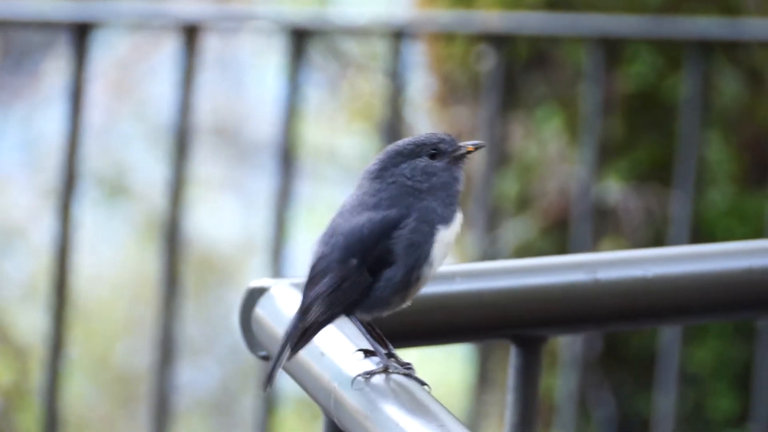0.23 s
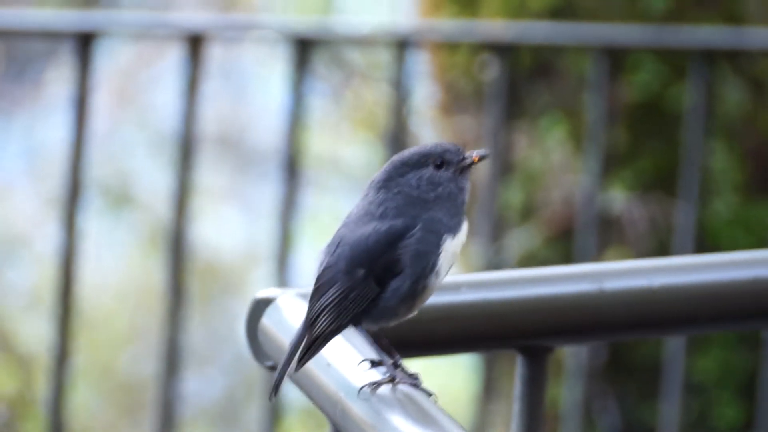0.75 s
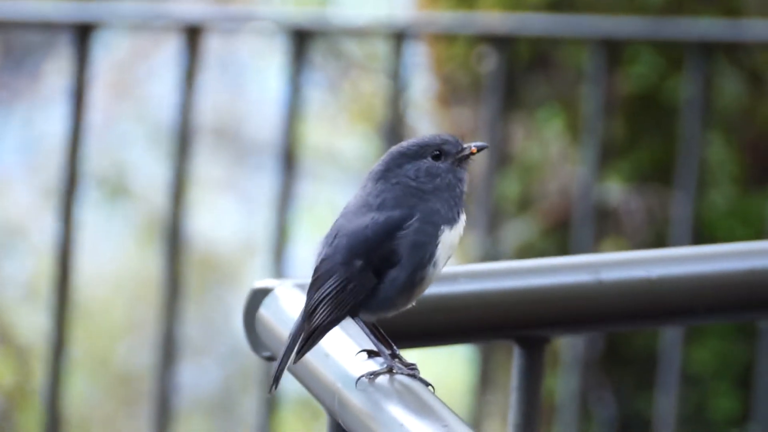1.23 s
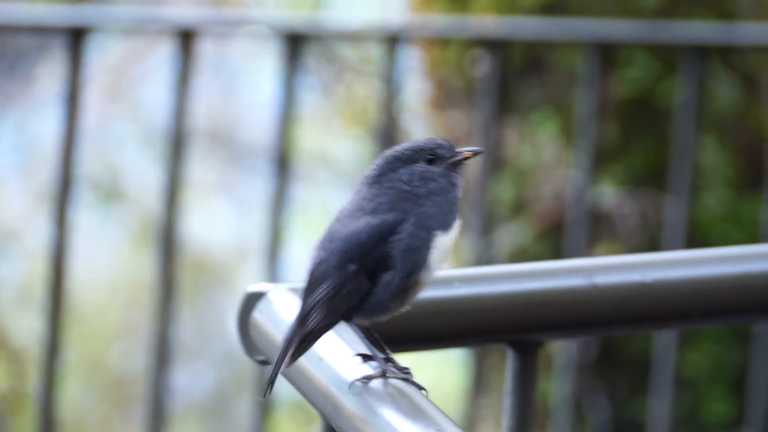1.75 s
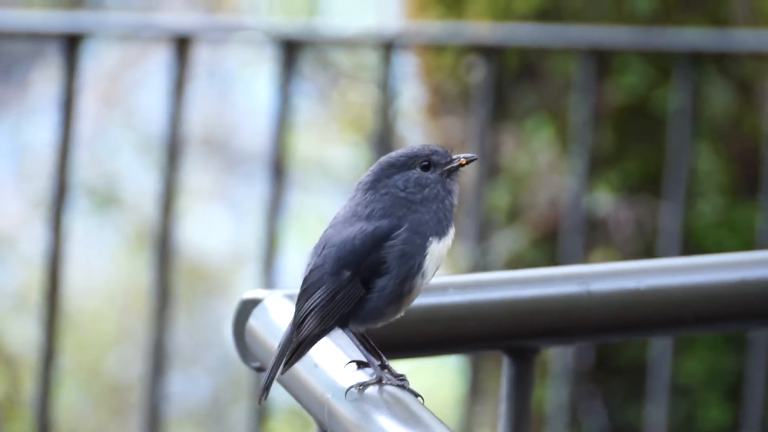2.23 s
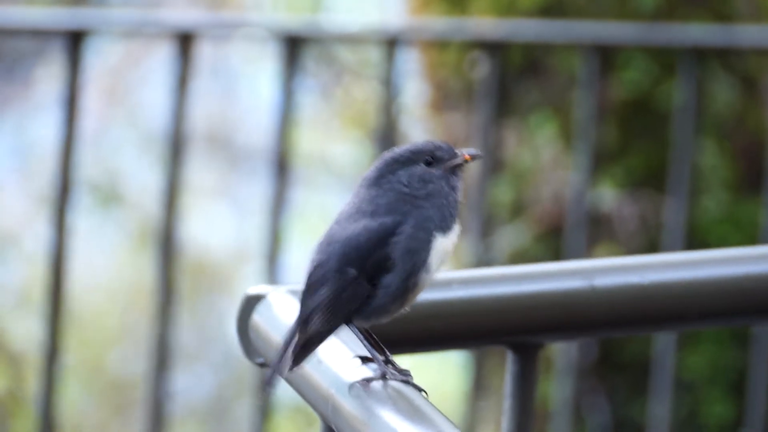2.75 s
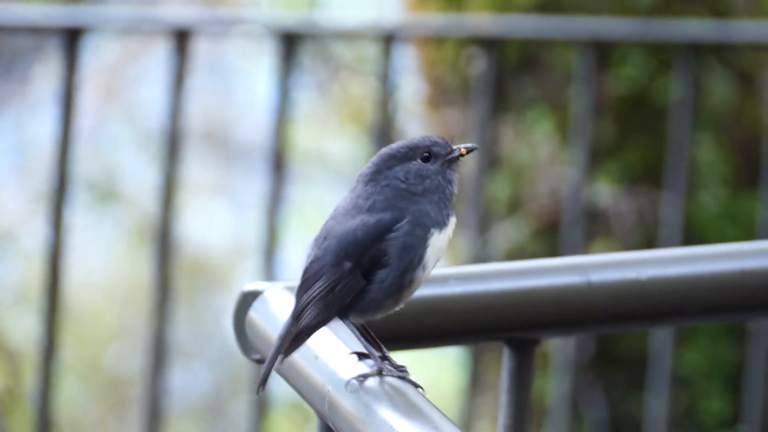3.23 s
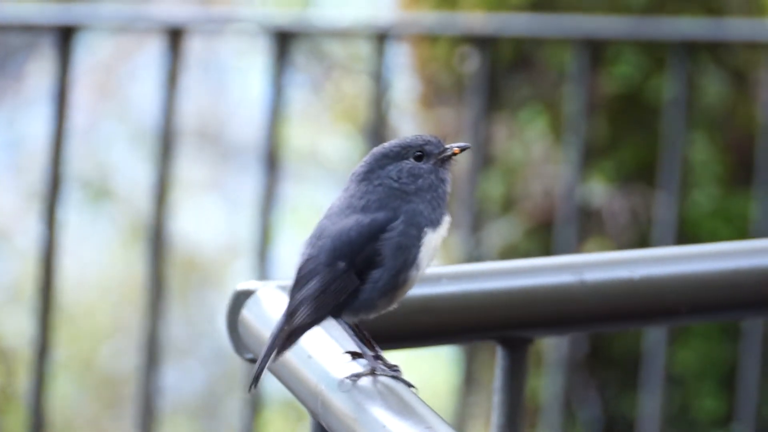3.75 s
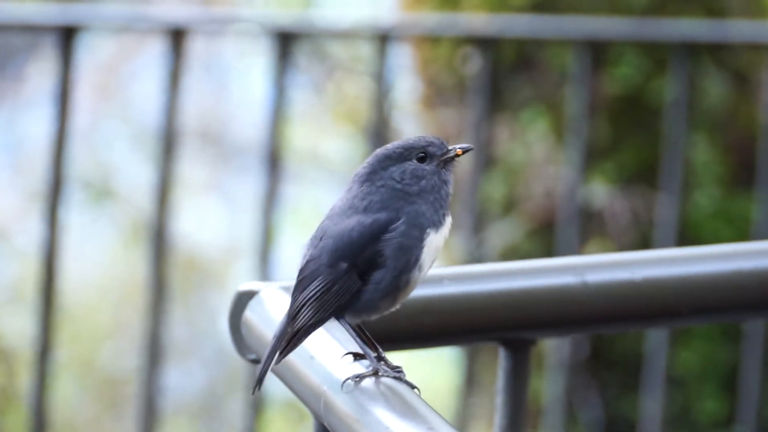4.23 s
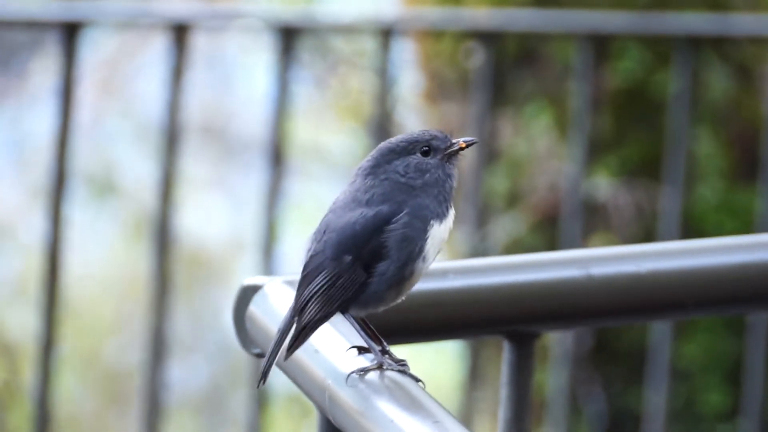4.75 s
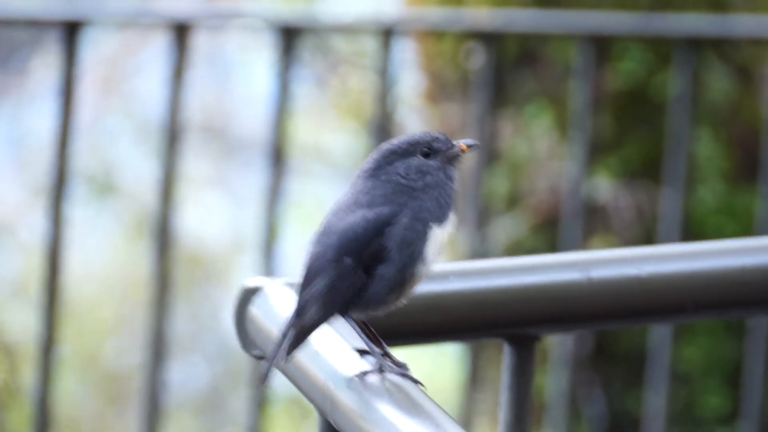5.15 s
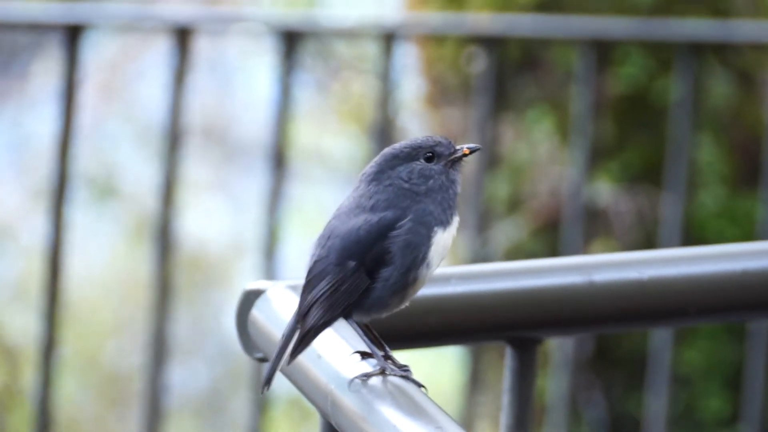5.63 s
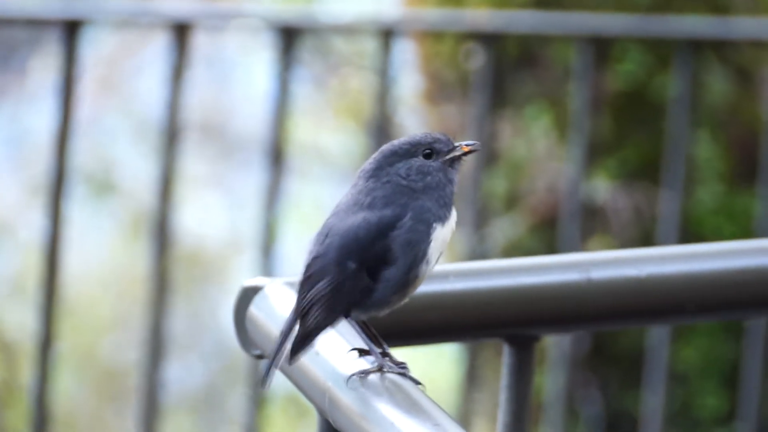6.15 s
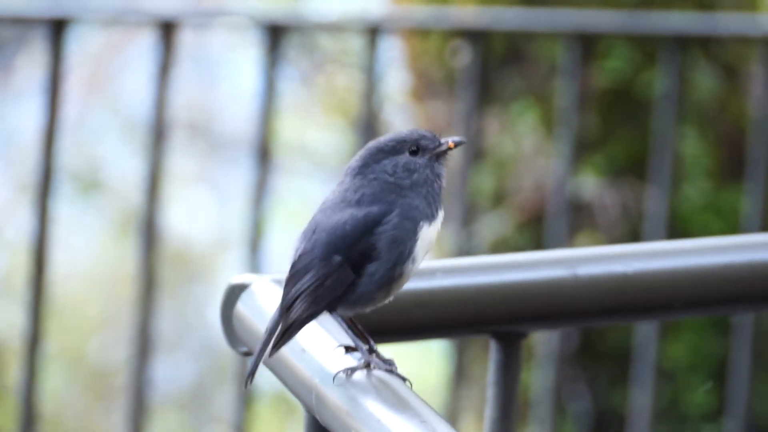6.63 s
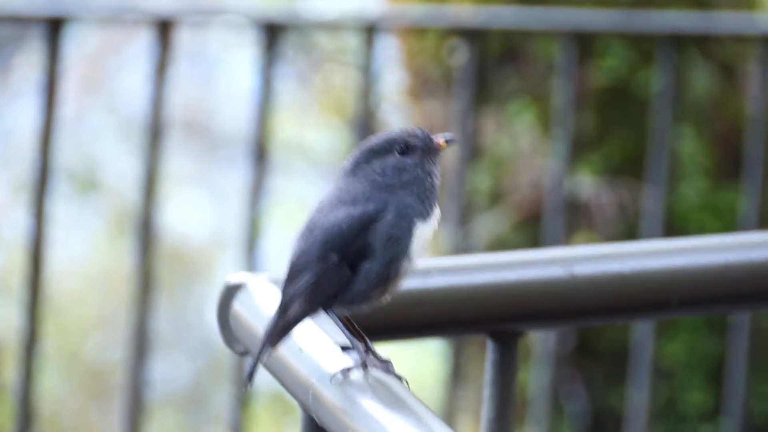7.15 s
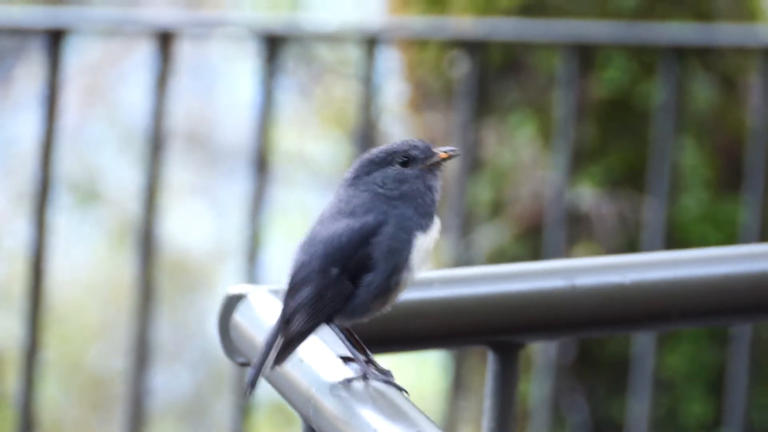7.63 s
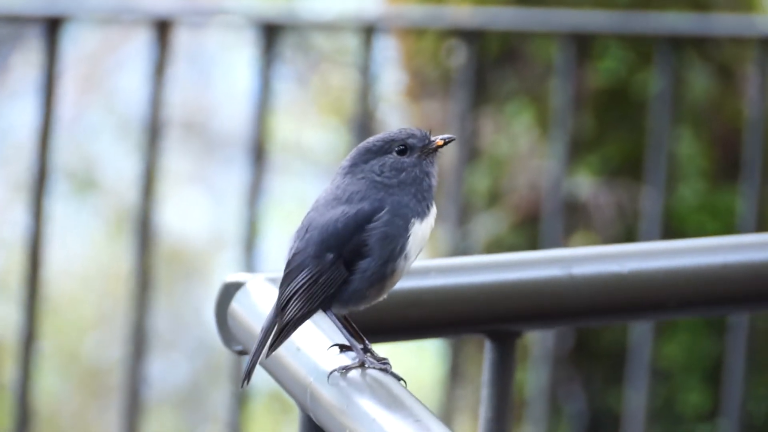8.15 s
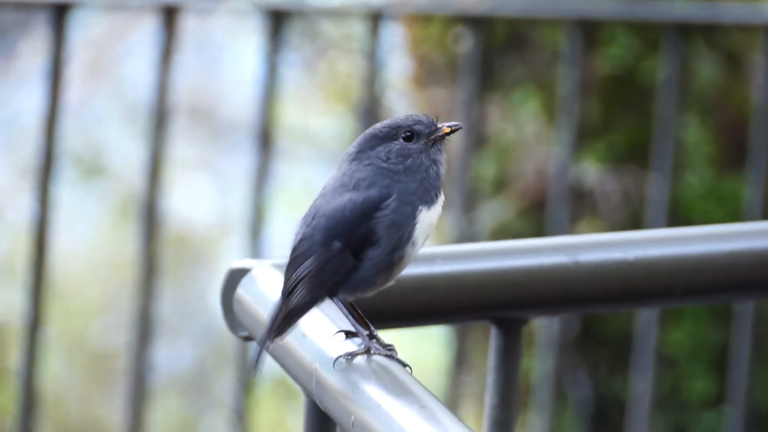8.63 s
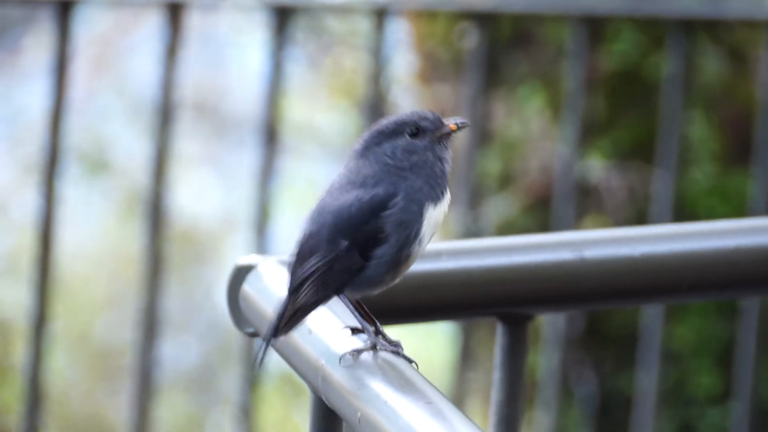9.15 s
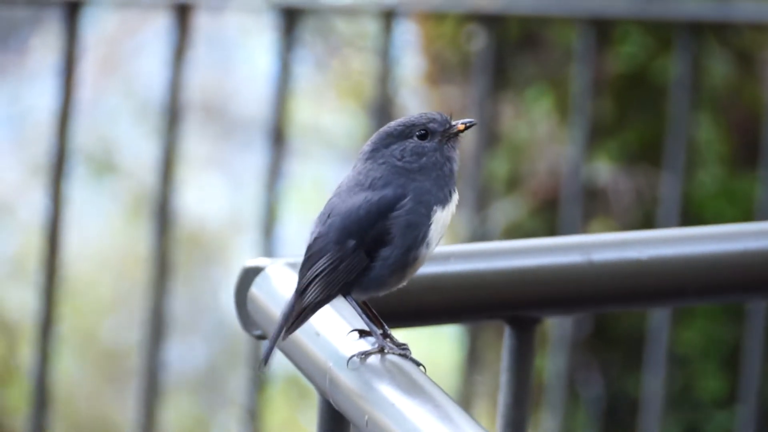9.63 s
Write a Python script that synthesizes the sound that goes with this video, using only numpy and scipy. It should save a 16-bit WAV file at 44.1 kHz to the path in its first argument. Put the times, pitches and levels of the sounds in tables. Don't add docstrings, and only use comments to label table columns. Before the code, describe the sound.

Bright, piercing birdsong switches between repeated high cheeps, buzzy trills and quick pips, with short woodland echoes and faint steady wind and water behind.

```python
import sys
import numpy as np
from scipy import signal
from scipy.fft import rfft, irfft
from scipy.io import wavfile
from scipy.ndimage import uniform_filter1d

SR = 44100
rng = np.random.default_rng(int(sys.argv[2]) if len(sys.argv) > 2 else 0)


def makeup_ratio(level_db):
    decades = np.asarray(level_db, float) / 20
    return 10 ** decades


def int16_out(signal):
    q = np.round(np.clip(np.atleast_2d(signal).T, -1, 1) * 32767)
    wavfile.write(sys.argv[1], SR, q.astype(np.int16))


N = 436568


def bird():
    phrases = opening() + chips() + rises() + trills() + duos() + small_calls() + falls() + closing()
    out = np.zeros(N + SR)
    for shape, notes, ratio, tones, *voice in phrases:
        for start_s, stretch, factor, db, *gap_hz in notes:
            note = makeup_ratio(db) * syllable(shape, stretch, factor, sum(gap_hz), ratio, tones, *voice)
            at = int((start_s + 0.09947) * SR)
            out[at:at + len(note)] += note
    return out[SR // 10:][:N]


# (time [s], level [dB])
LONE = [
    (2.981, -27),
    (4.3408, -26.5),
    (4.64, -30),
    (4.943, -20),
    (5.213, -20.5),
    (6.378, -26),
    (7.031, -24.5),
    (7.597, -24.5),
    (7.95, -28),
    (8.322, -26.5),
]


def lone(name):
    names = "low wide narrow first quick scoop cracked deep even held".split()
    start_s, db = LONE[names.index(name)]
    return [(start_s, 1, 1, db)]


# (time [ms], lower voice [Hz], level [dB])
CHEEP = [(0, 4760, -12), (3.02, 4750, -3.5), (5, 4840, 0.5), (6.94, 4785, -1.5), (9.24, 4950, 1.5),
         (13.1, 5340, -2), (16.8, 5680, -3), (20.6, 5900, -8.5)]
UPSLUR = [(0.0, 3520.0, -13.5), (4.87, 3492, 1), (21.3, 3533.3, 2), (30, 3670.0, -1.5), (41.4, 3780.0, 3),
          (54.8, 3930.0, -2.5), (65, 4020, -10.5)]
LOWRISE = [(0.0, 1490, -26), (5.932, 1900.0, -11), (11.96, 2170.0, -8.5), (20.019, 2330.0, -0.5),
           (32.393, 2470.0, -4.5), (43.62, 2520.0, -5.5)]
# (time [s], stretch [x], pitch [x], level [dB])
CHEEPS = [(-0.003, 1.0, 0.99, -32.5), (0.1785, 1.1, 0.98, -29.5), (0.357, 1.16, 0.99, -30.5),
          (0.537, 1.04, 1.0, -29.5), (0.727, 1.03, 0.983, -31.5), (0.924, 0.99, 0.98, -30.5)]
UPSLURS = [(1.136, 1.01, 1.02, -21.5), (1.3658, 0.99, 1.007, -20.5), (1.5877, 0.99, 1.01, -19.5),
           (1.8118, 1.02, 1.003, -19.5), (2.0562, 1.05, 1.003, -21.5), (2.286, 1.02, 1.0037, -20.5),
           (2.514, 1.06, 0.99798, -20.5), (2.757, 1.04, 0.99237, -20.5)]
# (tone, levels evenly from start to end [dB])
CHEEP_TONES = [("upper", -31, 0, 3.5, 4.9, 2, 2.4, 0), ("under", -46, -21, -17, -41),
               ("beyond", -33, -18, -17, -41), ("octave", -31.5, -14.5, -15.5, -16.5),
               ("both", -39.5, -13, -19, -22.5), ("third", -24, -9.5, -15)]
UPSLUR_TONES = [("octave", -35, -26), ("third", -33, -33.5)]
LOWRISE_TONES = [("octave", 13, -3.3, -22.5, -17), ("third", -29, -32.5), ("fourth", -11, -46)]


def opening():
    cheep_ratio = (1.35, 1.35, 1.335, 1.335, 1.31, 1.26, 1.3)
    return [(CHEEP, CHEEPS, cheep_ratio, CHEEP_TONES, False, 2.0),
            (UPSLUR, UPSLURS, 1, UPSLUR_TONES),
            (LOWRISE, lone("low"), 1, LOWRISE_TONES)]


# (time [ms], share of the way from end to top pitch [0-1], level [dB])
CHIP_LOW = [(0, 0.905, -7), (2, 0.99, -8), (4, 1, 0.5), (6, 0.865, 0), (8, 0.624, 0.5), (10, .38, -1.5),
            (12, 0.24, -6), (15, 0.055, -11.5), (18, 0.14, -16)]
CHIP_HIGH = [(0, 0.93, -14), (2, 1, -9.5), (4, 0.885, -8.5), (6, 0.715, -2), (8, .48, 3.5), (11, .27, 0),
             (14, .09, 2), (17, 0, -1.5), (20, 0, -7)]
# (time [s], stretch [x], top pitch [Hz], end pitch [Hz], level [dB])
CHIP_LOWS = [(3.153, 1.0, 3750, 1700, -25.5), (3.351, 1.0, 4170, 1740, -26),
             (3.546, 1.0, 4730, 1900, -23.5), (3.728, 0.9, 3970, 1710, -26.5),
             (3.907, .9, 3780, 1850, -29.5), (4.098, 1.0, 4840, 2020, -25.5)]
CHIP_HIGHS = [(3.152, 1.16, 5950, 3400, -30), (3.351, 1.12, 5900, 3370, -30),
              (3.546, 1.0, 5830, 3380, -29.5), (3.727, 1.0, 5400, 3315, -28.5),
              (3.906, 1.16, 5160, 3320, -26.5), (4.098, 0.83, 6870, 4600, -29.5)]
# (tone, levels from start to end [dB])
CHIP_TONES = [("both", -50, -17, -7, -30), ("octave", -37, -32)]
PURE = [("octave", -18, -23), ("third", -27, -33), ("fourth", -56, -62)]


def chips():
    gap_hz = 1153
    phrases = []
    for shape, notes, tones in (CHIP_LOW, CHIP_LOWS, CHIP_TONES), (CHIP_HIGH, CHIP_HIGHS, PURE):
        for start_s, stretch, top, end, db in notes:
            fall = [(ms, end + share * (top - end), level) for ms, share, level in shape]
            phrases.append((fall, [(start_s, stretch, 1, db, gap_hz)], 1, tones, True, 2.5))
    return phrases


# (first pitch peak [ms], peaks over troughs [dB], rows of
# (time [ms], centre [Hz], swing [Hz], period [ms], level [dB]))
RISE_WIDE = (13.0, -4, [(0, 3500, 300, 17.5, -20), (5, 3800, 550, 17.5, -4), (12, 4250, 450, 17, -1),
             (40, 4500, 300, 16.5, -3), (70, 4800, 120, 16.5, -6), (96, 5050, 5, 16.5, -9)])
RISE_NARROW = (12.5, -2, [(0, 3850, 50, 15, -5), (12, 4650, 320, 15, -3), (28, 4620, 170, 14, -5),
               (60, 4700, 150, 14, -5), (89, 5050, 5, 14, -4)])
# (tone, levels from start to end [dB])
WIDE_TONES = [("upper", -4, -8.5, -22), ("octave", -11, -33), ("both", -22, -29.5),
              ("upper_octave", -29, -33), ("third", -19, -25.5)]
NARROW_TONES = [("upper", -1.036, 7.2, -7, -15, -25), ("octave", -7, -26), ("both", -13, -33),
                ("upper_octave", -22.5, -29.5), ("third", -13.5, -29)]


def rises():
    return [(warble(*RISE_WIDE), lone("wide"), 1.49, WIDE_TONES, False, 2.2),
            (warble(*RISE_NARROW), lone("narrow"), 1.47, NARROW_TONES, False, 2.2)]


# (first pitch peak [ms], peaks over troughs [dB], rows of
# (time [ms], centre [Hz], swing [Hz], period [ms], level [dB]))
TRILL = (0.3, 0, [(0, 3500, 650, 19, -16), (3, 3500, 650, 19, -6.5), (10, 3650, 740, 18, -1),
         (18.1, 3850, 640, 16.5, 0.5), (35.2, 4030, 690, 19, -0.5), (51, 3950, 690, 16.5, -3),
         (68.2, 3950, 810, 17.5, -6), (85, 3820, 500, 16.5, -8.5), (94, 3750, 450, 17, -14)])
TRILL_QUICK = (0.1, 0, [(0, 3400, 600, 18, -12), (3, 3400, 570, 18, -4), (9, 3550, 765, 17.5, -2.5),
               (17.5, 3800, 700, 18, 1.5), (34, 3760, 630, 14, -3), (49.5, 3870, 720, 16.5, -2.5),
               (67.2, 3810, 610, 9.7, -4), (81.7, 3600, 500, 14.9, -6), (89.8, 3500, 500, 15, -7.5)])
TRILL_DEEP = (0.1, 0, [(0, 3300, 580, 18, -12), (3, 3300, 620, 18, -5), (9.05, 3420, 786, 18, -1.5),
              (17.9, 3780, 670, 16.8, 0), (35, 3830, 630, 16.3, -1), (51.3, 3880, 820, 17, -4),
              (69, 3850, 780, 19, -4), (85.6, 3780, 664, 17.5, -5.5), (96, 3650, 670, 18.6, -9)])
# (time [s], stretch [x], pitch [x], level [dB])
DEEP_TRILLS = [(5.488, 0.99, 0.98, -20.5), (5.770, 0.98, 1.0, -20)]
# (tone, levels from start to end [dB])
TRILL_TONES = [("octave", -20.5, -25.5, -23.5), ("third", -31, -34)]


def trills():
    kinds = (TRILL, lone("first")), (TRILL_QUICK, lone("quick")), (TRILL_DEEP, DEEP_TRILLS)
    return [(warble(*shape), notes, 1, TRILL_TONES, True, 1.8) for shape, notes in kinds]


# (time [ms], lower voice [Hz], level [dB])
DUO = [(0.0, 4800.0, -11), (5.0824, 5420, 0.5), (14.4, 4960, -1), (23, 4400, -10)]
SINK = [(0, 5300, -14), (2.996, 5550, -3.5), (11.805, 5190, -1.5), (21.84, 4950, -7.5)]
# (time [s], stretch [x], pitch [x], level [dB], optional voice gap [Hz])
DUOS = [(6.044, 1.0, 0.98, -29, 15)]
SINKS = [(6.192, 0.97, 0.97, -29.5)]
# (tone, levels from start to end [dB])
DUO_TONES = [("upper", -2, 0.86, 0, -4, -30), ("under", -33, -31, -16, -24, -40), ("octave", -16.5, -17),
             ("both", -23, -16, -30), ("upper_octave", -16, -22.5, -40), ("third", -9, -20)]


def duos():
    sink_tones = DUO_TONES[:1] + DUO_TONES[2:]
    return [(DUO, DUOS, (1.56, 1.418, 1.26, 1.26, 1.25), DUO_TONES, False, 2.0),
            (SINK, SINKS, (1.31, 1.29, 1.24, 1.13, 1.1), sink_tones, False, 2.0)]


# (time [ms], lower voice [Hz], level [dB])
HIGHPIP = [(0, 4000, -11), (1.5, 4450, -1), (4, 4640, 2), (10, 4780, 2.5), (12.5, 4930, -1), (15, 4950, -8)]
CRACKED = [(0, 4440, -10), (2.5, 4630, 1), (6, 5050, 1), (9, 5100, -1), (12, 5270, -2), (16.9, 5300, -7),
           (24, 5200, -10), (32.2, 5500, -18)]
SCOOP = [(0, 3430, -3), (2, 3330, -1), (5, 3170, 3), (8, 3120, 1.5), (12, 3270, 2), (16, 3330, 4.5),
         (20, 3500, 2.5), (22, 3400, -13)]
DROP = [(0, 5700, -22), (2, 4600, -8), (4.03, 4040, -1.5), (7, 3730, 1.5), (10, 3590, 2), (13, 3560, 1.5),
        (19, 3620, -1), (23, 3665, -3.5), (26, 3630, -12)]
BLIP = [(0, 2509, -19), (4, 2486, -2), (9, 2632, -3)]
HOOK = [(0, 3950, -10), (3, 4080, 1), (6, 4430, -1), (9, 4600, -12)]
CHUCK = [(0.0, 2980, 1), (2.9899, 2900.0, 0), (8.185, 2450.0, 3.5), (14.7, 2050, -1.5), (22.1, 1740, -5)]
# (time [s], stretch [x], pitch [x], level [dB])
HIGHPIPS = [(6.3399, 1.0, 1.005, -23.5), (6.564, 0.98, 0.995, -23), (6.8037, 1.0, 1, -22.5)]
DROPS = [(6.599, 0.98, 1, -19.5), (6.840, 1.0, 1.002, -18.5), (7.066, 1.03, 1.01, -18)]
BLIPS = [(6.816, 0.869, 0.9636, -45.5)]
HOOKS = [(4.112, 1.0, 0.96, -25.5)]
CHUCKS = [(7.244, 1.1, 1.0237, -30.5), (7.402, 1.06, 0.96, -31)]
# (tone, levels from start to end [dB])
HIGHPIP_TONES = [("octave", -21.5, -29), ("third", -38, -42)]
CRACKED_TONES = [("octave", -24, -24, -30), ("upper", -60, -31, -13, -40, -60, -60),
                 ("both", -60, -32, -22, -45, -60, -60), ("over", -60, -30, -22, -45, -60, -60)]
DROP_TONES = [("octave", -22.5, -32.5, -36), ("third", -26, -33.5, -38)]
CHUCK_TONES = [("octave", -52, -18, -7, -9), ("third", -25, -44), ("fourth", -37.5, -39.5)]


def small_calls():
    return [(HIGHPIP, HIGHPIPS, 1, HIGHPIP_TONES),
            (CRACKED, lone("cracked"), 0.5, CRACKED_TONES, False, 1.5),
            (SCOOP, lone("scoop"), 1, DROP_TONES),
            (DROP, DROPS, 1, DROP_TONES),
            (BLIP, BLIPS, 1, PURE),
            (HOOK, HOOKS, 1, PURE, False, 2.0),
            (CHUCK, CHUCKS, 1, CHUCK_TONES, False, 2.5)]


# (first pitch peak [ms], peaks over troughs [dB], rows of
# (time [ms], centre [Hz], swing [Hz], period [ms], level [dB]))
FALL_DEEP = (9.8, -15, [(0, 7600, 300, 19.2, -17), (10, 7700, 300, 19.2, -6), (24, 7500, 250, 19.2, -8),
             (38, 6450, 1100, 19.5, -14), (76, 5850, 950, 18.3, -11), (110, 5330, 950, 17.2, -7),
             (152, 5200, 800, 17.4, -10)])
FALL_EVEN = (5.2, -3, [(0, 7400, 500, 18.6, -1), (20, 7000, 650, 18.4, 0), (50, 6480, 720, 16.4, -5),
             (100, 6000, 720, 15.5, -4), (150, 5500, 550, 15.5, -4)])
FALL_HELD = (18.5, -4, [(0, 7500, 5, 19, -4), (5, 7850, 5, 19, 2), (21, 7700, 50, 19, 3),
             (28, 7100, 500, 19, 0), (56, 6550, 650, 18.5, -6), (72, 6250, 600, 15, -6),
             (130, 5750, 500, 14.6, -8)])
# (tone, levels from start to end [dB])
FALL_TONES = [("octave", -15, -21.5, -23)]


def falls():
    return [(warble(*FALL_DEEP), lone("deep"), 1, FALL_TONES, False, 1.5),
            (warble(*FALL_EVEN), lone("even"), 1, FALL_TONES, False, 1.6),
            (warble(*FALL_HELD), lone("held"), 1, FALL_TONES, False, 1.4)]


# (time [ms], lower voice [Hz], level [dB])
LOWPIP = [(0.0, 3300, -8.5), (3.0, 3441.8, 2), (8.0, 3590.0, 3.5), (14.0, 3560.0, 0.5), (18.0, 3350, -7.5)]
MIDPIP = [(0.0, 4160, -1.5), (3.887, 4393, 2), (10.141, 4430.0, 3.5), (16.5, 4520.0, 2), (24.7, 4560, -24)]
ARCH = [(0, 3230, -9), (3.02, 4330, 1.5), (6, 5250, 0.5), (9.07, 5620, -1), (12.03, 5300, 1.5),
        (16.2, 4600, 0), (20, 4000, -4), (23.8, 3320, -18.5)]
# (time [s], stretch [x], pitch [x], level [dB])
LOWPIPS = [(8.6457, 1, 0.99763, -21.5), (8.8742, 1, 1.0075, -20), (9.1419, 0.96, 0.983, -22),
           (9.3871, 0.97, 1.027, -20.5)]
MIDPIPS = [(8.6943, 0.89, 1.0098, -21), (8.926, 1, 0.99114, -19.5), (9.192, 1, 0.976, -20),
           (9.437, 1, 1.016, -20)]
ARCHES = [(9.613, .98, 0.991, -22.5), (9.799, 1.01, 0.996, -24)]
# (tone, levels from start to end [dB])
LOWPIP_TONES = [("octave", -28, -39), ("third", -37.5, -31)]
MIDPIP_TONES = [("octave", -22.5, -26), ("third", -33, -45)]
ARCH_TONES = [("octave", -18, -27.5, -35), ("third", -27, -35)]


def closing():
    return [(LOWPIP, LOWPIPS, 1, LOWPIP_TONES),
            (MIDPIP, MIDPIPS, 1, MIDPIP_TONES),
            (ARCH, ARCHES, 1, ARCH_TONES, False, 1.8)]


def warble(peak_ms, peak_db, rows):
    ms, centre, swing, period, db = np.transpose(rows)
    step_ms = 0.5
    t = np.arange(0, ms[-1], step_ms)

    def along(values):
        return np.interp(t, np.maximum.accumulate(ms), values)

    turns = np.cumsum(step_ms / along(period))
    wave = np.cos(2 * np.pi * (turns - np.interp(peak_ms, t, turns)))
    hz = along(centre) + along(swing) * wave
    level_db = along(db) + peak_db / 2 * wave * along(swing) / max(swing)
    return np.transpose([t, hz, level_db])


MIX = dict(lower=(1, 0), upper=(0, 1), octave=(2, 0), third=(3, 0), fourth=(4, 0), both=(1, 1),
       under=(2, -1), over=(2, 1), beyond=(-1, 2), upper_octave=(0, 2))
# (frequency [Hz], level [dB])
THROAT = [(1800, -6.5), (2800, -4), (3300, -0.5), (3750, 3), (4500, -2), (5500, -2), (6600, -9), (7500, -4),
          (9000, 1.5), (16000, 3)]


def syllable(shape, stretch, factor, gap_hz, ratio, tones, throat=False, flutter_db=0.5):
    rise_ms, fall_ms, flutter_ms, wobble = 0.7, 2.66, 1.48, 0.0029
    ms, hz, db = np.transpose(shape)
    t = np.arange(int((ms[-1] * stretch + fall_ms) * SR / 1000)) * 1000 / SR
    place = np.interp(t / stretch, np.maximum.accumulate(ms), np.arange(len(ms)))

    def smooth(values):
        return uniform_filter1d(np.interp(place, np.arange(len(ms)), values), size=60, mode="nearest")

    def spread(values):
        return np.interp(t / t[-1], np.linspace(0, 1, np.size(values)), np.ravel(values))

    shake = uniform_filter1d(rng.standard_normal(len(t)), size=40) * 6
    lower = smooth(hz) * factor * (1 + wobble * shake)
    upper = lower * spread(ratio) + gap_hz
    out = 0
    for name, *tone_db in [("lower", 0)] + tones:
        lower_times, upper_times = MIX[name]
        f = lower_times * lower + upper_times * upper
        level_db = spread(tone_db) + throat * np.interp(f, *np.transpose(THROAT))
        out = out + makeup_ratio(level_db) * (f < 17000) * np.sin(2 * np.pi * np.cumsum(f) / SR)
    hold = max(int(flutter_ms * SR / 1000), 1)
    flutter = uniform_filter1d(uniform_filter1d(rng.standard_normal(len(t)), hold), hold)
    flutter = flutter * np.sqrt(1.5 * hold)
    edge = np.clip(t / rise_ms, 0, 1) * np.clip((t[-1] - t) / fall_ms, 0, 1)
    return out * makeup_ratio(smooth(db) + flutter_db * flutter) * np.sin(edge * np.pi / 2) ** 2


# (time [s], left minus right [dB])
HEAD = [
    (0, 0),
    (1, 0.5),
    (1.2, 1.5),
    (3, 1),
    (4, 1.5),
    (5.5, 1),
    (6.6, 2.5),
    (8, 1.5),
    (8.6, 2.5),
    (9.9, 2.5),
]


def direct_path(notes):
    lag_rad, lag_hz = 1.7, 5000
    pan_db = np.interp(np.arange(N) / SR, *np.transpose(HEAD))
    lag = np.exp(-1j * lag_rad * np.tanh(np.fft.rfftfreq(N, 1 / SR) / lag_hz))
    left = irfft(rfft(notes) * lag, N)
    return np.array([left, notes]) * makeup_ratio(np.array([pan_db, -pan_db]) / 2)


# (delay [ms], left [dB], right [dB])
NEAR = [(3.0, -24, -21), (6.6, -23, -24), (10.4, -20, -24), (19.0, -19, -20)]


def nearby():
    out = np.zeros((2, SR // 20))
    for ms, left_db, right_db in NEAR:
        out[:, int(ms * SR / 1000)] = makeup_ratio(np.array([left_db, right_db]))
    return out


# (level [dB], decay by 60 dB [s], build-up [s], left-right likeness [0-1])
LEAVES = [
    (-13.5, 0.2, 0.014, 0.75),
    (-15.5, 0.44, 0.033, 0.5),
]
# (frequency [Hz], level [dB])
LEAF_COLOUR = [(1500, 4.5), (3100, 5.5), (3600, -2.5), (4500, -2), (5500, 6), (7500, 0), (10000, 1),
               (16000, 4.5)]


def forest():
    t = np.arange(SR) / SR
    soak = signal.butter(2, 13000, fs=SR)
    late = 1 - np.exp(-t / 0.3)
    out = np.zeros((2, SR))
    for db, t60, build, like in LEAVES:
        a, b = rng.standard_normal((2, SR)) * makeup_ratio(4.243 * rng.standard_normal(SR))
        pair = np.array([a, like * a + np.sqrt(1 - like ** 2) * b])
        pair = pair * (1 - np.exp(-t / build)) * makeup_ratio(-60 * t / t60)
        pair = signal.lfilter([1, -0.7], [1], pair)
        dull = signal.lfilter([0.5], [1, -0.5], pair)
        pair = signal.lfilter(*soak, (1 - late) * pair + late * dull)
        out += makeup_ratio(db) * pair / np.sqrt(np.mean(np.sum(pair ** 2, axis=1)))
    hz, db = np.transpose(LEAF_COLOUR)
    colour_db = np.interp(np.log(np.arange(SR // 2 + 1) + 1), np.log(hz), db)
    return irfft(rfft(out) * makeup_ratio(colour_db), SR)


def echoes(notes):
    stir_per_s = 0.6
    stir = 2 * np.pi * stir_per_s * np.arange(N) / SR + walk(stir_per_s)
    paths = (1, nearby()), (np.cos(stir), forest()), (np.sin(stir), forest())
    return sum(signal.fftconvolve((share * notes)[None], path, axes=1)[:, :N] for share, path in paths)


# (frequency [Hz], level per Hz [dB])
RUSH_MID = [(15, -44), (25, -33), (92, -27.5), (200, -7), (317, -1.5), (677, 1), (2550, -12.5), (4030, -17),
            (4610, -16), (6050, -20.5), (7110, -20), (9070, -22), (11000, -22.5), (14800, -24.5),
            (16000, -27.5)]
RUSH_SIDE = [(15, -72), (25, -42), (120, -28.5), (317, -10), (591, -5), (863, -3.5), (3080, -13.5),
             (3620, -15.5), (5430, -17), (7110, -21), (8360, -21.5), (14800, -22.5), (16000, -48)]


def background():
    lean, lean_hz = -0.13, 700
    mid = rush(RUSH_MID, -54.5)
    side = rush(RUSH_SIDE, -56) + lean * signal.lfilter(*signal.butter(1, lean_hz, fs=SR), mid)
    return mid + np.array([side, -side])


def rush(points, db):
    hz, shape_db = np.transpose(points)
    f = np.maximum(np.fft.rfftfreq(N, 1 / SR), 1)
    colour = makeup_ratio(np.interp(np.log(f), np.log(hz), shape_db))
    x = irfft(rfft(rng.standard_normal(N)) * colour, N)
    return x / x.std() * makeup_ratio(db + 0.3 * walk(0.67) + 0.1 * walk(6))


def walk(rate):
    k = int(SR / rate)
    held = np.repeat(rng.standard_normal(N // k + 1), k)
    return 1.3 * uniform_filter1d(uniform_filter1d(held, k), k)[:N]


def whine():
    hz, db = 15050, -93
    return makeup_ratio(db) * np.sin(2 * np.pi * hz * np.arange(N) / SR)


def scene():
    notes = bird()
    return direct_path(notes) + echoes(notes) + background() + whine()


def starve(dry, size=1024, count=8):
    mask_db, up_db, down_db = -9, 14, 30
    hop = dict(nperseg=size, noverlap=size * 3 // 4)
    hz, _, z = signal.stft(dry, SR, **hop)
    bands = z[:, :-1].reshape(len(z), -1, count, z.shape[-1])
    power = np.sum(abs(bands) ** 2, axis=(0, 2))
    bark = 7 * np.arcsinh(hz[count // 2::count][:len(power)] / 650)
    above = bark[:, None] - bark
    skirt = makeup_ratio(2 * (mask_db - np.where(above > 0, up_db * above, -down_db * above)))
    z[:, :-1] *= np.repeat(power > skirt @ power, count, axis=0)
    return signal.istft(z, SR, **hop)[1][:, :N]


def low_pass(x):
    return signal.sosfilt(signal.butter(12, 17040, fs=SR, output="sos"), x)


def record(dry):
    top_cut = signal.ellip(8, 0.2, 60, 16000, fs=SR, output="sos")
    mix = starve(signal.sosfilt(top_cut, dry))
    return low_pass(mix)


dry = scene()
out = record(dry)
int16_out(out)
```